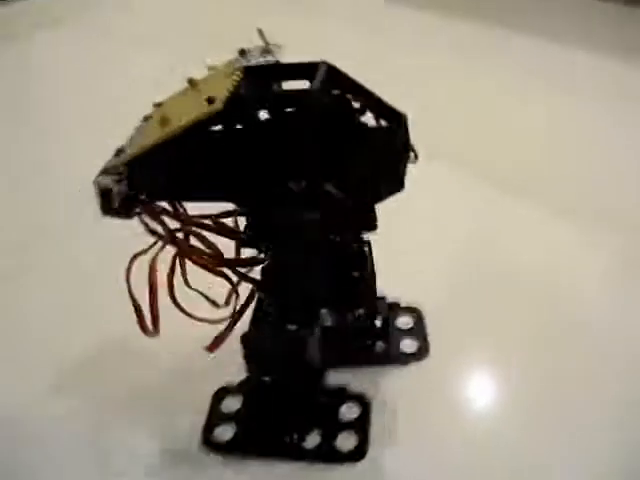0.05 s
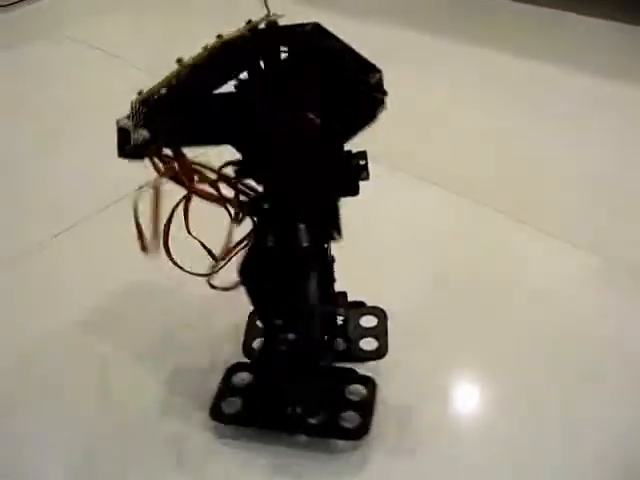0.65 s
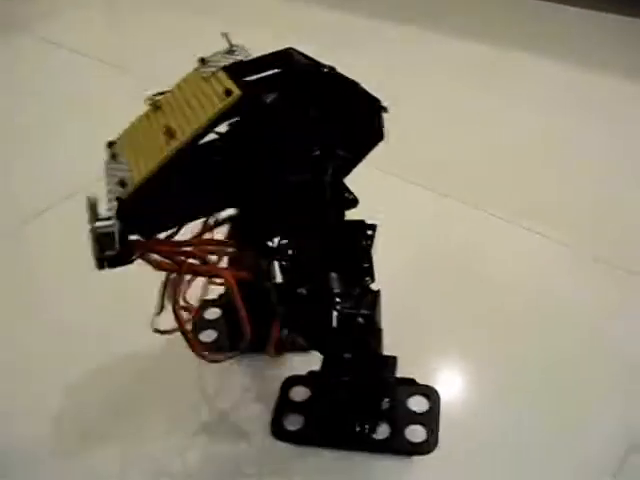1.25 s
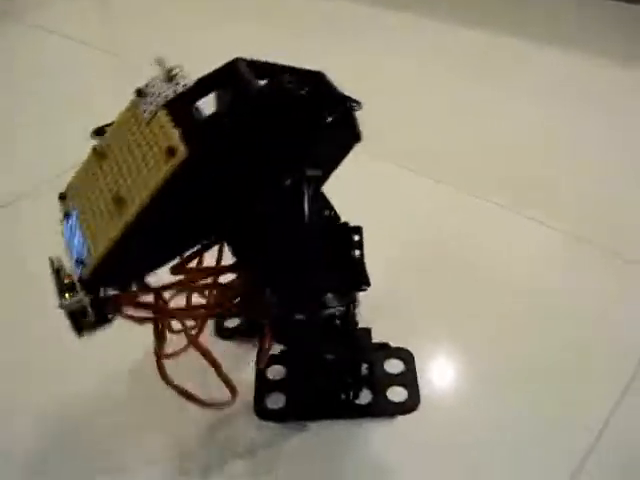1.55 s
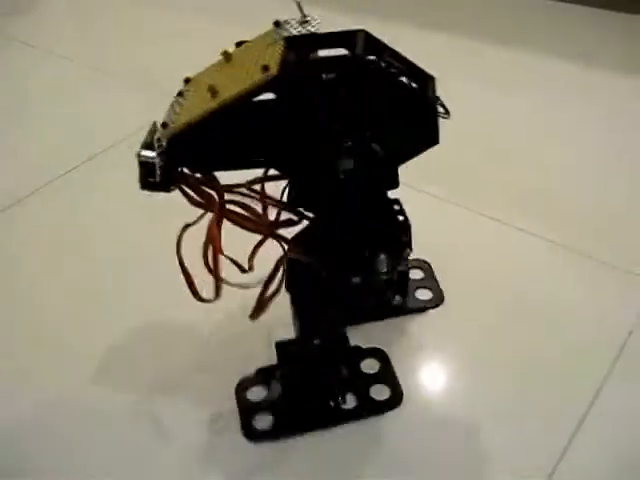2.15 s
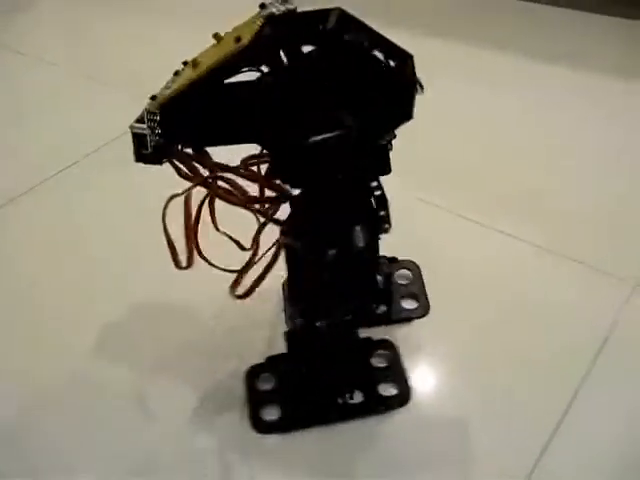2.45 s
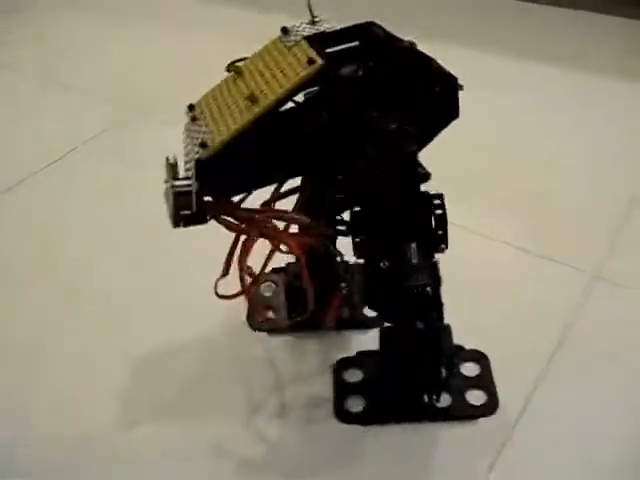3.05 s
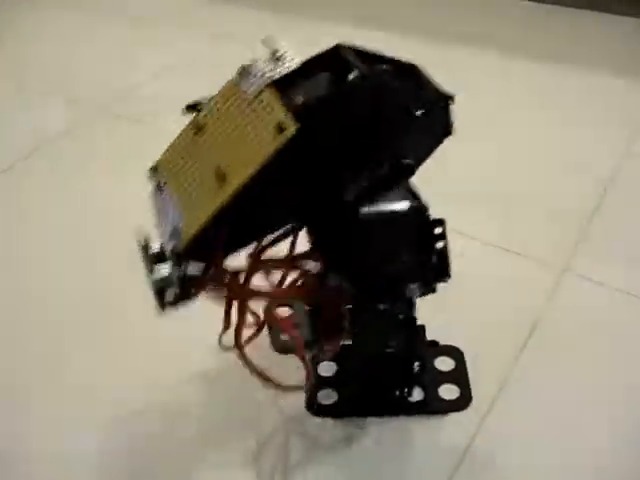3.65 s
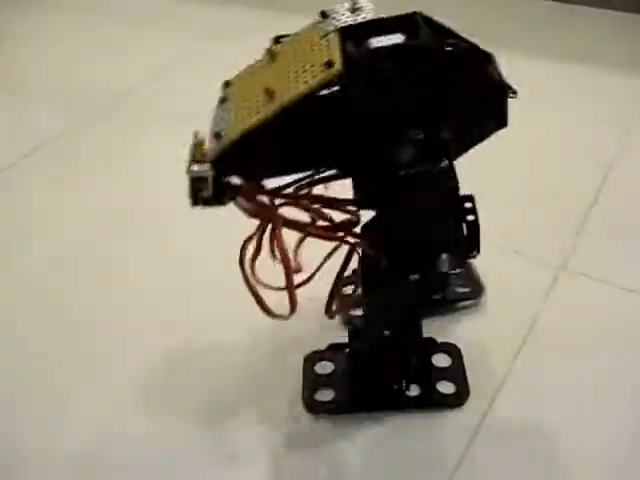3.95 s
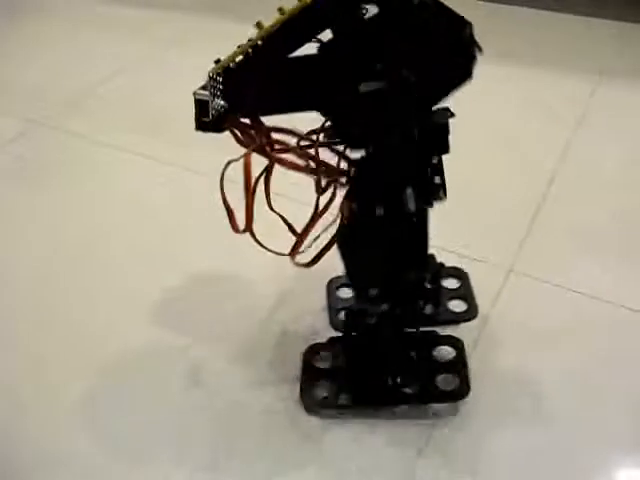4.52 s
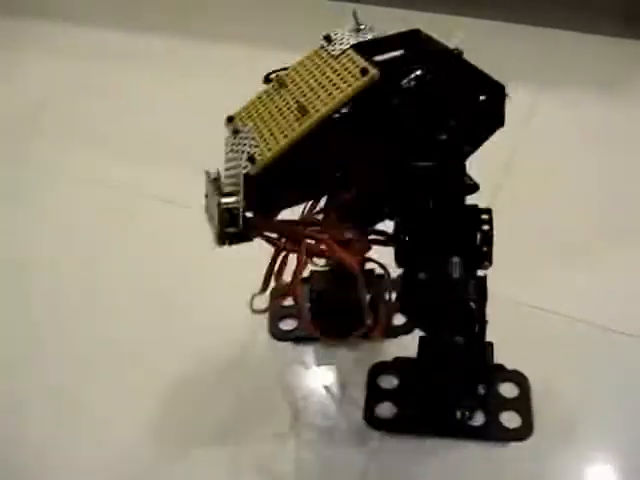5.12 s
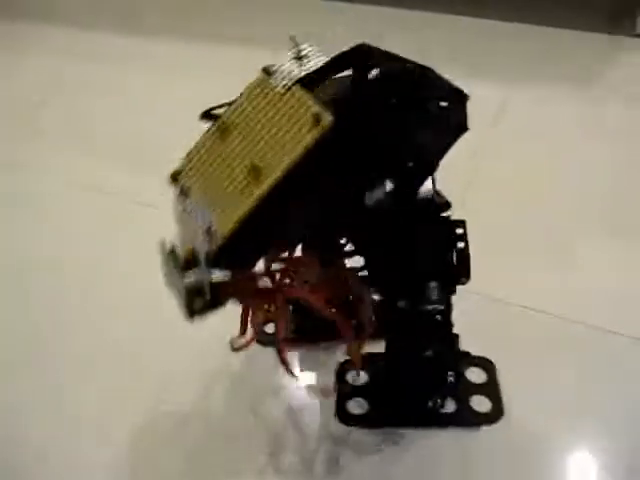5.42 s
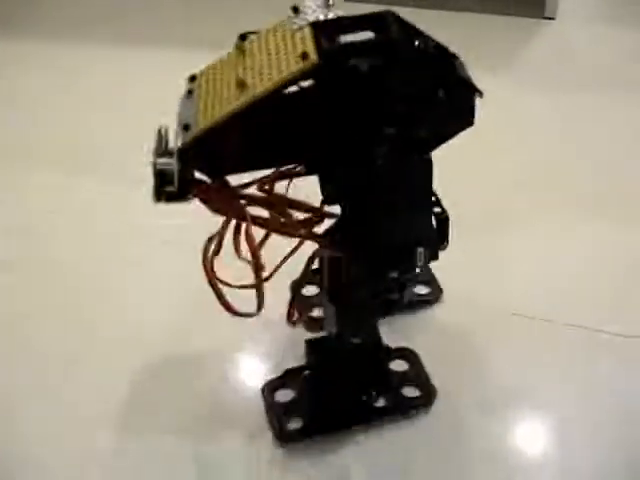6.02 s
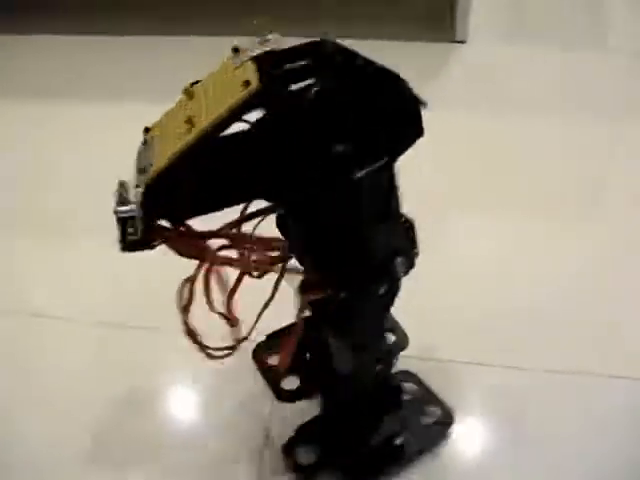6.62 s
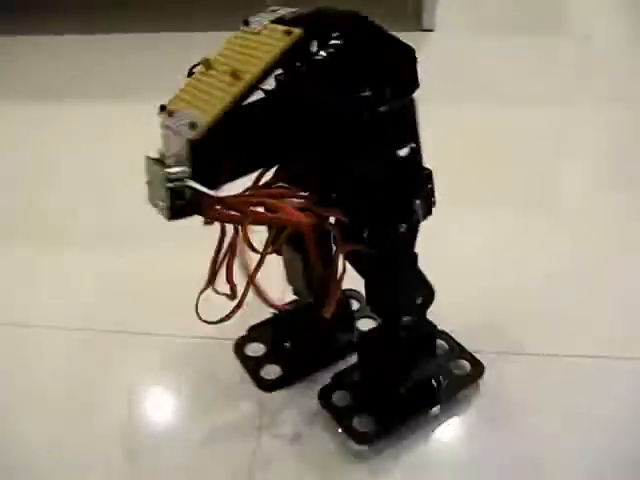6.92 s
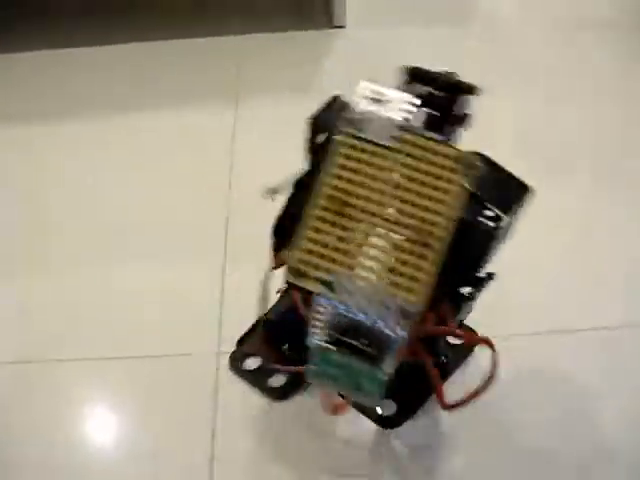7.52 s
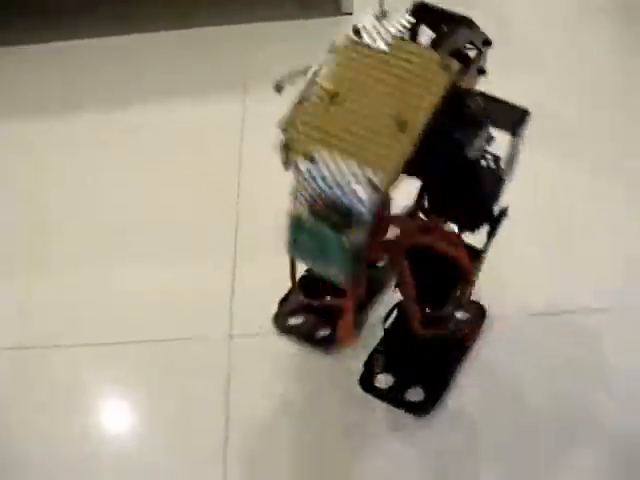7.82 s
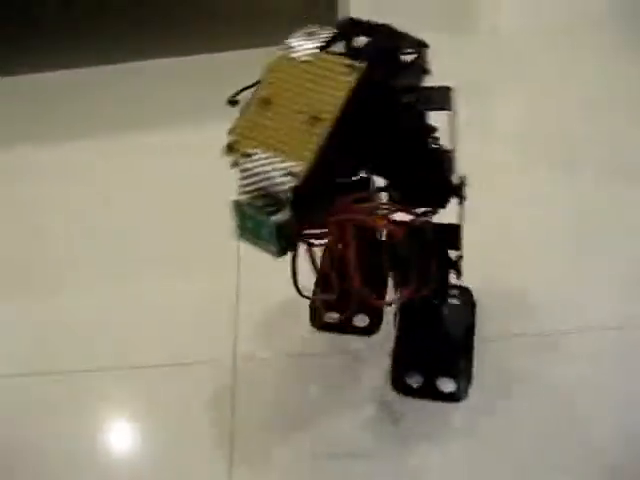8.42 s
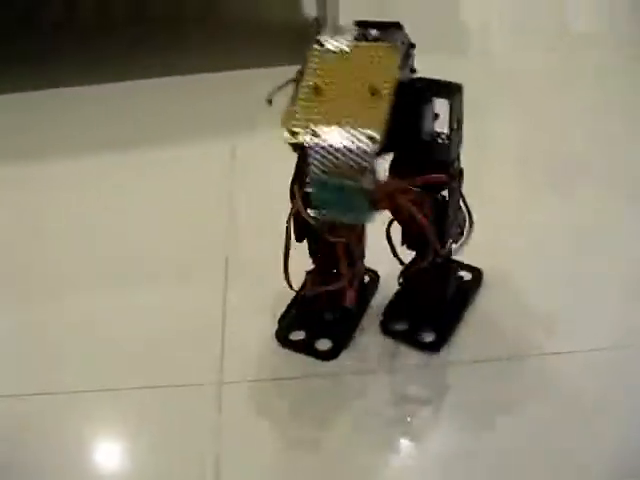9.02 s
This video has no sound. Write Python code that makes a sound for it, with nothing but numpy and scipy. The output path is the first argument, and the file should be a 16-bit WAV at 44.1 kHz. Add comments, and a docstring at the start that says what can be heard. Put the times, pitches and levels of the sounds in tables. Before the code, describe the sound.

High, fizzy servo whirring runs throughout as a little walking robot strides over tiles, close to the microphone in a quiet, slightly echoing room. The gears throb under load and give short whines, easing off for a moment roughly every two seconds. Light metallic clacks and small scrapes mark the steps. The last stride is a softer turn on the spot, with brighter, briefly ringing foot strikes.

```python
"""A small two-legged robot is already walking on tiles, servos whirring: gear teeth ring cases and brackets.
Every 2 s it leans, swings a foot, rises over it, brings the other along and eases off briefly.
In the lean and the rise the loaded servos throb with their 50 Hz control pulses; metal feet and joints
clack and skid at each step. From 7.4 s the last stride is a lighter turn on the spot.
A quiet, hard room with mains hum surrounds it to the end. Mono."""
import sys
import numpy as np
from scipy import signal
from scipy.fft import rfft, irfft, next_fast_len
from scipy.io import wavfile
from scipy.ndimage import uniform_filter1d, minimum_filter1d, map_coordinates

SR = 44100
rng = np.random.default_rng(int(sys.argv[2]) if len(sys.argv) > 2 else 0)


def wrap_up_sound(samples):
    """Save the sound to the file named by the first command line argument, as 16-bit audio."""
    columns = np.atleast_2d(samples).T
    # keep every value between -1 and 1, then stretch to whole-number steps
    tamed = np.clip(columns, -1, 1)
    steps = np.round(tamed * 32767).astype(np.int16)
    wavfile.write(sys.argv[1], SR, steps)


N = 408787


def servos():
    """Gear rattle, direct and through the parts it shakes; the level wavers as the controllers hunt."""
    speed_db, case_db, bracket_db = gait()
    load, shift_hz = strokes()
    pulsing = np.sqrt(1 + load * throb(sharpness=1.8, uneven_db=4.5))
    rattle = teeth(mesh_hz=481.1, drift=0.22, scatter_db=1.5, scrape=0.77, contact_s=0.00094)
    fizz = tooth_fizz(rattle, speed_db)
    drive = teeth(mesh_hz=399.9, drift=0.16, scatter_db=3, scrape=0.4, contact_s=0.0022)
    focus = np.clip(1.2 * load, 0, 1)  # one hard-driven servo rings narrowly, several spread the ring
    case_hz = 4873 * (1 + 0.0258 * speed_db) + shift_hz
    case = servo_case(drive, rattle, case_hz, case_db, load, focus)
    bracket = leg_bracket(bracket_db)
    pinion = fast_pinion(drive, speed_db, focus)
    hunting = amp(0.55 * wobble(24) + 0.4 * wobble(130))
    return hunting * ((case + pinion + whines()) * pulsing + bracket + fizz)


# Strides, the last a turn: (start [s], pace [dB], effort [dB], leg shake [dB], throb share [0-1])
STRIDES = [(-.6, 0.26, 0, -3, 0.88), (1.4, 0.16, .5, 2, 0.95), (3.405, 0.34, 0.9, -0.6, 0.94),
           (5.415, 0.4, .5, 0, 0.93), (7.41, -0.5, -3.5, -7, 0.45)]
# Moves of a stride: (time in stride [s], motor speed [dB], case drive [dB], bracket drive [dB])
STRIDE_MOVES = [(0, -0.4, -31.5, -56), (.07, 0, -29.3, -46), (.28, 0.2, -31.5, -42), (.4, -0.2, -30.5, -39),
                (.53, 1.5, -31, -33), (.6, 2.5, -33, -37), (.71, 0.5, -31.5, -36), (.81, -2, -32, -34.5),
                (.9, 0.06, -30.5, -33.5), (1, -1.5, -31, -43.5), (1.07, 0.53, -29.5, -39.5),
                (1.22, 0, -31, -39.5), (1.39, -0.5, -33.5, -42.5), (1.53, 1, -35, -37.5),
                (1.66, -0.55, -37.5, -39), (1.75, -0.85, -42.5, -50), (1.9, 1, -33.5, -42.5)]


def gait():
    """Motor speed, case drive and bracket drive; the moves repeat, never at quite the same speed."""
    moves = [(start + s, speed + pace, case + effort, bracket + shake)
             for start, pace, effort, shake, _ in STRIDES for s, speed, case, bracket in STRIDE_MOVES]
    speed_db, case_db, bracket_db = ramped_steps(moves, ramp_s=0.037)
    return speed_db + 0.3 * wobble(14), case_db, bracket_db


# Lean and rise: (start in stride [s], end in stride [s], load [0-1], case ring shift [Hz])
LOAD_STROKES = [(.02, .58, .66, 116), (.97, 1.42, 0.48, -40)]


def strokes(ramp_s=0.033):
    """Motor load and the shift it gives the case ring, scaled by each stride's throb share."""
    t, load, shift_hz = np.arange(N) / SR, np.zeros(N), np.zeros(N)
    for start, *_, share in STRIDES:
        for begin, end, depth, hz in LOAD_STROKES:
            on = share * np.clip(np.minimum(t - start - begin, start + end - t) / ramp_s, 0, 1)
            load += depth * on
            shift_hz += hz * on
    return np.clip(load, 0, 0.95), shift_hz


def throb(sharpness, uneven_db, control_hz=50.13):
    """Power swing of a loaded motor: one uneven burst of current per control pulse."""
    cycle = control_hz * np.arange(N) / SR - 0.52
    burst = np.exp(sharpness * np.cos(2 * np.pi * cycle)) * amp(uneven_db * wobble(50))
    return burst / burst.mean() - 1


def teeth(mesh_hz, drift, scatter_db, scrape, contact_s, trains=3):
    """Gear trains at wandering speeds: each tooth gives a tick and a short scrape."""
    ticks = np.zeros(N)
    for _ in range(trains):
        tooth_hz = mesh_hz * np.exp(drift * (wobble(4) + 0.12 * wobble(30)))
        contacts = np.diff(np.floor(np.cumsum(tooth_hz) / SR), prepend=0)
        ticks += contacts * amp(scatter_db * np.clip(rng.standard_normal(N), -2, 2))
    rub_power = signal.lfilter([1], [1, -np.exp(-1 / (contact_s * SR))], ticks ** 2)
    rub = np.sqrt(rub_power) * rng.standard_normal(N)
    return np.sqrt(1 - scrape) * unit(ticks - ticks.mean()) + np.sqrt(scrape) * unit(rub)


def servo_case(drive, rattle, case_hz, case_db, load, focus):
    """Teeth ring the servo cases and a body plate; load brings in two more modes."""
    narrow = np.sqrt(focus) * resonate(drive, case_hz, width_hz=380)
    spread = np.sqrt(1 - focus) * resonate(rattle, case_hz, width_hz=750)
    lower_mode = amp(-8 + 1.7 * wobble(13)) * resonate(drive, 4334, 320)
    strain = amp(-9) * resonate(drive, 7040, 150) + amp(-16.5) * resonate(drive, 2475, 380)
    plate = amp(-29.5) * resonate(drive, 1544, 124)
    ring = unit(narrow + spread + lower_mode) + load * strain + plate
    return ring * amp(case_db - 0.1 + 1.4 * wobble(25))


# Tooth contact spectrum: (frequency [Hz], relative density [dB])
FIZZ_SPECTRUM = [(700, -34), (1500, -17), (2400, -8.5), (3100, -5.5), (4150, 3), (4900, -7), (5600, 2.5),
                 (6500, 0.5), (7900, -0.4), (9400, -1.4), (11700, 0.5), (13000, -8.5), (15000, -19.5),
                 (16000, -32)]


def tooth_fizz(rattle, speed_db):
    """Tooth contacts heard directly, louder with speed; the colour flickers as the parts shift."""
    fizz = filtered(rattle, lambda hz: amp(log_interp(FIZZ_SPECTRUM, hz)))
    spectra = signal.stft(fizz, nperseg=512)[2]
    patches = uniform_filter1d(rng.standard_normal(spectra.shape), size=5, axis=0)  # about 400 Hz
    patches = uniform_filter1d(patches, size=12, axis=1)  # about 70 ms
    fizz = signal.istft(spectra * amp(1.3 * unit(patches)), nperseg=512)[1][:N]
    return unit(fizz) * amp(-30.5 + speed_db + 0.94 * wobble(25))


def leg_bracket(bracket_db, sag_hz_per_db=11):
    """The output gears ring a leg bracket, lower in pitch when it is shaken harder."""
    gears = teeth(mesh_hz=302.3, drift=0.15, scatter_db=3, scrape=0.4, contact_s=0.0013, trains=2)
    ring_hz = 3445 - sag_hz_per_db * (bracket_db - bracket_db.mean())
    return resonate(gears, ring_hz, width_hz=430) * amp(bracket_db - 2.5 + 1.1 * wobble(25))


def fast_pinion(drive, speed_db, focus):
    """The pinion rings the gearbox broadly and settles on one mode when driven hard."""
    gears = teeth(mesh_hz=557.6, drift=0.17, scatter_db=4.5, scrape=0.55, contact_s=0.0015)
    main_mode = (np.sqrt(focus) + amp(-14)) * resonate(gears, 8860, 720)
    lower_mode = amp(-5) * resonate(gears, 7880, 360)
    spread = np.sqrt(1 - focus) * resonate(drive, 8410 * (1 + 0.03 * speed_db), width_hz=1700)
    return unit(main_mode + lower_mode + spread) * amp(-37 + 2.5 * speed_db + 1.6 * wobble(25))


# Joint whines: (start in stride [s], end in stride [s], centre [Hz], width [Hz], base level [dB])
JOINT_WHINES = [(0.078, 0.356, 5060, 220, -35), (0.255, .56, 8880, 300, -37), (0.71, .85, 5720, 800, -34.5),
                (.72, .94, 3570, 110, -37), (0.885, 0.997, 4530, 350, -38), (1.094, 1.38, 4360, 320, -40.5),
                (1.62, 1.75, 5620, 300, -37.5), (1.766, 1.85, 3800, 400, -37.5),
                (1.776, 1.94, 11620, 400, -42), (1.83, 1.965, 6050, 380, -38.5)]


def whines():
    """A joint's gears briefly ring their mount, louder in a heavy stride."""
    gears = teeth(mesh_hz=329.4, drift=0.18, scatter_db=0, scrape=0.32, contact_s=0.0013, trains=2)
    rows = [(start + begin, start + end, hz, width_hz, db + 0.45 * effort + 0.38 * shake)
            for start, _, effort, shake, _ in STRIDES for begin, end, hz, width_hz, db in JOINT_WHINES]
    return swells(gears, rows)


# Metal frame modes: (centre [Hz], width [Hz], relative gain [dB])
FRAME_MODES = [(3294, 330, 10), (3980, 160, 5), (4530, 280, 3), (5800, 230, 6.5), (6830, 380, -6.5),
               (8150, 260, 4), (8830, 530, 0.5), (10120, 660, 1), (11900, 570, -2.5), (12340, 680, -7)]


def frame_ring(chatter, bright_db):
    """Chatter rings the frame's modes, at new strengths for each blow."""
    scatter_db = rng.normal(0, 2.5, len(FRAME_MODES))

    def response(hz):
        modes = sum((-1) ** k * amp(db + scatter_db[k]) * 1j * hz * width
                    / (centre ** 2 - hz ** 2 + 1j * hz * width)
                    for k, (centre, width, db) in enumerate(FRAME_MODES))
        tilt = amp(bright_db * np.log2(np.clip(hz, 3000, 12000) / 6000))
        low_cut = hz ** 4 / (hz ** 4 + 2300 ** 4)
        return modes * tilt * low_cut

    return filtered(chatter, response)


# Foot and joint blows: (time [s], level [dB], brightness [dB/octave], t60 [s])
BLOWS = [(0.0117, -11.5, 7, 0.008), (.0185, -20, -1, .015), (.059, -22, -2, .012), (1.0607, -16, 4, .02),
         (1.1016, -12, 1, 0.014), (1.794, -18, -1, 0.026), (2.6668, -16.5, -1, 0.03),
         (2.7285, -12, -1, 0.014), (3.999, -7, 0, 0.011), (4.752, -19, 7, 0.028), (4.9581, -16, 2, 0.016),
         (5.0174, -13.5, 1.5, 0.023), (5.4742, -7.5, 8, 0.0046), (5.8204, -18, -22, 0.033),
         (5.826, -15.5, 4, .018), (5.847, -17, 1, 0.015), (5.8524, -16, 4, .018), (6.5083, -23, 8, .025),
         (7.0436, -12.5, 2.5, 0.022), (7.0532, -14.5, 9, 0.016), (7.184, -15, 2, 0.013),
         (7.83, -5.5, 8, 0.012), (7.8402, -7, 12, 0.0098), (8.0862, -6, 4, 0.0088), (8.989, -9, 10, .011)]


def clacks(snap_t60_s=0.006):
    """Metal strikes with a hard, bright snap, then a short chatter that rings the frame."""
    out, t = np.zeros(N), np.arange(SR // 10) / SR
    for s, db, bright_db, t60_s in BLOWS:
        fade = amp(-60 * t / t60_s)
        ring = frame_ring(fade * rng.standard_normal(len(t)), bright_db)
        add(out, s, amp(db) * ring * np.linalg.norm(fade) / np.linalg.norm(ring))
        snap = resonate(rng.standard_normal(len(t)), centre_hz=10500, width_hz=4400)
        add(out, s, amp(db - 10.5 + 0.55 * bright_db - 60 * t / snap_t60_s) * snap)
    return out


# Jolted parts: (time [s], level [dB], centre [Hz], width [Hz], t60 [s])
JOLTS = [(.0115, -31, 1550, 1500, 0.081), (1.077, -37.5, 810, 160, 0.067),
         (1.8627, -15.5, 5050, 1400, 0.016), (2.7283, -32.5, 1900, 1100, 0.024),
         (4.9577, -14, 5600, 700, .014), (5.7, -19, 5850, 830, 0.022), (5.14, -33, 2700, 700, 0.023),
         (5.4742, -27.5, 700, 1500, 0.006), (7.044, -23, 3250, 260, 0.066), (7.1838, -31, 1460, 450, 0.033),
         (7.1835, -20, 4100, 370, 0.034), (7.8307, -32, 925.9, 1800, 0.0068),
         (7.8298, -20, 3290, 290, 0.15), (8.0856, -30, 540, 900, 0.0064), (8.0862, -12.5, 3730, 670, 0.017),
         (8.085, -38, 3900, 185.2, 0.28)]


def knocks():
    """A sole, bracket or servo case rings after a jolt."""
    out, t = np.zeros(N), np.arange(SR // 5) / SR
    for s, db, hz, width_hz, t60_s in JOLTS:
        ring = resonate(rng.standard_normal(len(t)), hz, width_hz)
        add(out, s, amp(db - 60 * t / t60_s) * ring)
    return out


# Sole squeals: (start [s], end [s], centre [Hz], width [Hz], level [dB])
SOLE_SKIDS = [(0, .06, 10600, 3500, -34), (0.95, 0.998, 4900, 300, -26), (1.06, 1.14, 11000, 2000, -33),
              (1.067, 1.162, 2460, 900, -42.5), (2.3, 2.423, 4050, 900, -31),
              (2.952, 3.06, 3000, 300, -37.5), (4.05, 4.36, 7960, 900, -37), (4.2, 4.4, 3350, 250, -36),
              (4.886, 5.02, 3400, 200, -37), (6.78, 6.83, 10000, 4000, -33), (7.05, 7.14, 10800, 1200, -32),
              (7.24, 7.378, 4860, 450, -34.5), (7.245, 7.42, 7900, 400, -35.5),
              (7.58, 7.648, 8340, 450, -38), (7.97, 8.06, 7950, 450, -30.5), (7.96, 8.08, 5400, 400, -34.5),
              (8.124, 8.2, 6100, 1100, -33), (8.95, 9.08, 3230, 300, -39.5), (9.202, 9.27, 11600, 400, -36)]


def skids():
    """Metal sticks and slips on the tile: a grainy rub that rings the sole."""
    rub = rng.standard_normal(N) * amp(1.5 * wobble(300))
    return swells(rub, SOLE_SKIDS)


# Room decay: (frequency [Hz], t60 [s])
ROOM_DECAY = [(300, 0.42), (3000, 0.62), (8000, 0.15), (15000, 0.35)]


def room(x):
    """The tiled room answers after 5 ms, dying sooner in the treble."""
    hz, t, spectra = signal.stft(rng.standard_normal(SR // 2), SR, nperseg=256)
    decay = amp(-60 * t / log_interp(ROOM_DECAY, hz)[:, None])
    tail = signal.istft(spectra * decay, SR, nperseg=256)[1]
    delayed = np.pad(x, (SR // 200, 0))
    return signal.fftconvolve(delayed, tail / np.linalg.norm(tail))[:N]


# Room air spectrum: (frequency [Hz], relative density [dB])
AIR_SPECTRUM = [(20, -8), (50, -4.5), (80, -5), (115, 1), (230, -4), (380, -2), (620, 0.5), (1050, -2),
                (1550, -1.5), (2500, -10), (6000, -17)]


def room_air():
    """Soft, steady noise of the room's air."""
    air = filtered(rng.standard_normal(N), lambda hz: amp(log_interp(AIR_SPECTRUM, hz)))
    return amp(-50) * unit(air)


# Hum tones: (frequency [Hz], rms level [dB])
HUM_TONES = [(49, -74.5), (144.5, -68)]


def mains_hum():
    """Faint mains hum, slightly unsteady in level and pitch."""
    hum = np.zeros(N)
    for hz, db in HUM_TONES:
        peak = np.sqrt(2) * amp(db + 1.7 * wobble(5))
        cycles = np.cumsum(hz + 1.196 * wobble(6.8)) / SR
        hum += peak * np.sin(2 * np.pi * cycles)
    return hum


def amp(db):
    """Decibels to gain."""
    return 10 ** (np.asarray(db) / 20)


def unit(x):
    """Scale to rms 1."""
    return x / np.sqrt(np.mean(x ** 2) + 1e-20)


def log_interp(points, hz):
    """Interpolate (frequency [Hz], value) points on a log axis."""
    point_hz, values = np.transpose(points)
    return np.interp(np.log(hz + 1), np.log(point_hz + 1), values)


def ramped_steps(rows, ramp_s):
    """One curve per column after the time: each row holds, then ramps to the next."""
    times_s, *columns = np.transpose(rows)
    row = np.searchsorted(times_s, np.arange(N) / SR) - 1
    return [uniform_filter1d(column[row], size=round(ramp_s * SR)) for column in columns]


def wobble(rate_hz):
    """A smooth random curve, rate_hz knots a second."""
    coarse = np.arange(0, N + 32, 32)
    knots = rng.standard_normal(int(N * rate_hz / SR) + 4)
    return np.interp(np.arange(N), coarse, map_coordinates(knots, [coarse * rate_hz / SR]))


def filtered(x, response):
    """Apply a gain given as a function of frequency in Hz."""
    size = next_fast_len(len(x) + SR // 4)
    return irfft(rfft(x, size) * response(np.fft.rfftfreq(size, 1 / SR)), size)[:len(x)]


def resonate(x, centre_hz, width_hz):
    """A steep-sided resonance whose centre may move; rms 1."""
    carrier = np.exp(2j * np.pi * np.cumsum(centre_hz * np.ones(len(x))) / SR)
    pole = np.exp(-np.pi * np.sqrt(2) * abs(width_hz) / SR)
    return unit(np.real(carrier * signal.lfilter([1], [1, -2 * pole, pole ** 2], x / carrier)))


def add(track, s, sound):
    """Mix a sound into the track at s seconds."""
    i = round(s * SR)
    track[i:i + len(sound)] += sound[:N - i]


def swells(drive, rows, margin_s=0.02):
    """For each row the drive rings one resonance, which swells and fades."""
    out = np.zeros(N)
    for start, end, hz, width_hz, db in rows:
        onset_s = max(start - margin_s, 0)
        if end > 0 and onset_s < N / SR:
            run = drive[round(onset_s * SR):round((end + margin_s) * SR)]
            add(out, onset_s, amp(db) * signal.windows.tukey(len(run), 0.5) * resonate(run, hz, width_hz))
    return out


def scene():
    """The robot close by, in its room."""
    motion = servos() + skids()
    impacts = clacks() + knocks()
    reverb = amp(-12.5) * room(motion) + amp(-8.5) * room(impacts)
    mono = amp(0.02) * motion + impacts + reverb + room_air() + mains_hum()
    return np.array([mono, mono])


def record(dry, ceiling=0.6, top_hz=15850):
    """A quick limiter ducks the hardest blows; nothing passes above the band limit."""
    needed_gain = np.minimum(1, ceiling / (np.abs(dry).max(axis=0) + 1e-9))
    held_gain = minimum_filter1d(needed_gain, size=641, origin=300)
    limited = dry * uniform_filter1d(held_gain, size=41)
    return np.array([filtered(channel, lambda hz: hz < top_hz) for channel in limited])


dry = scene()
out = record(dry)
wrap_up_sound(out)
```